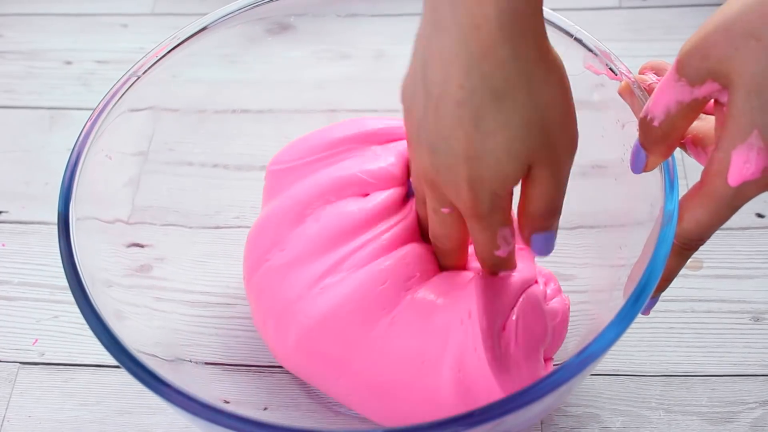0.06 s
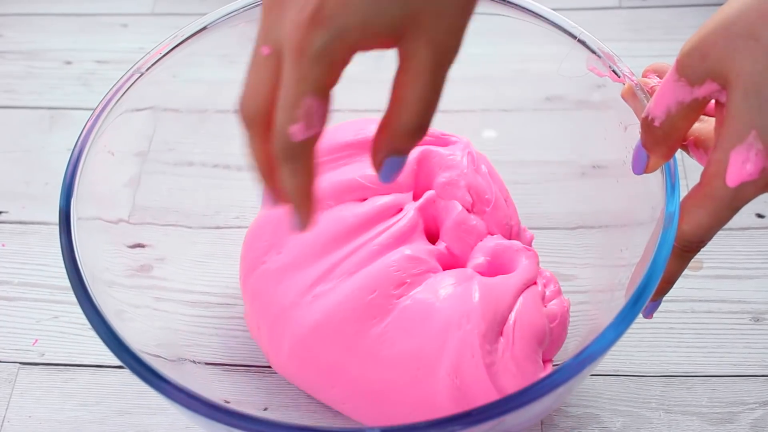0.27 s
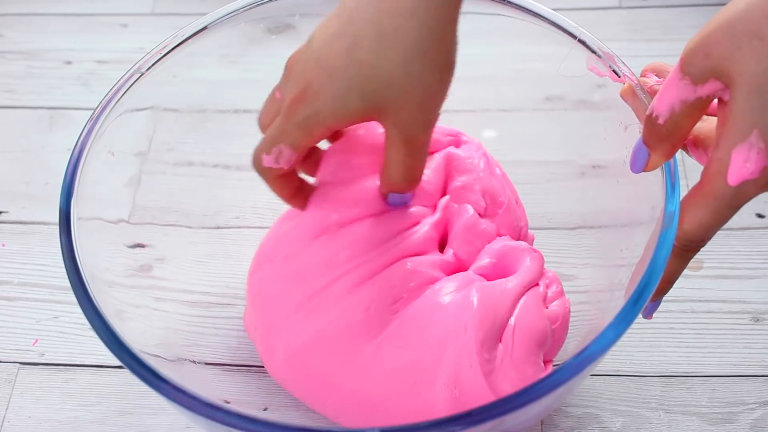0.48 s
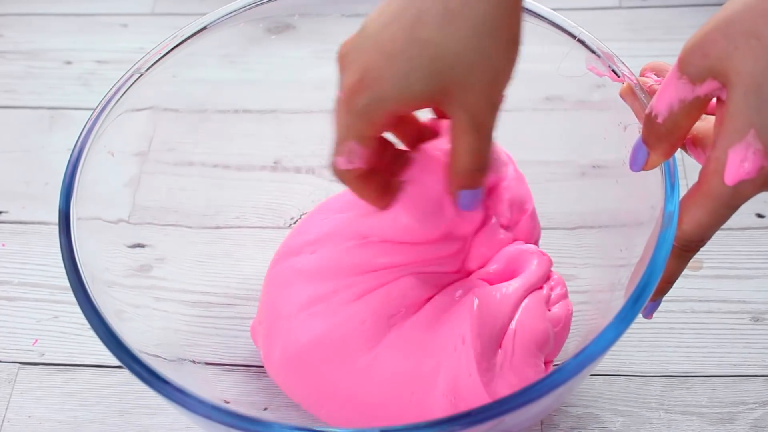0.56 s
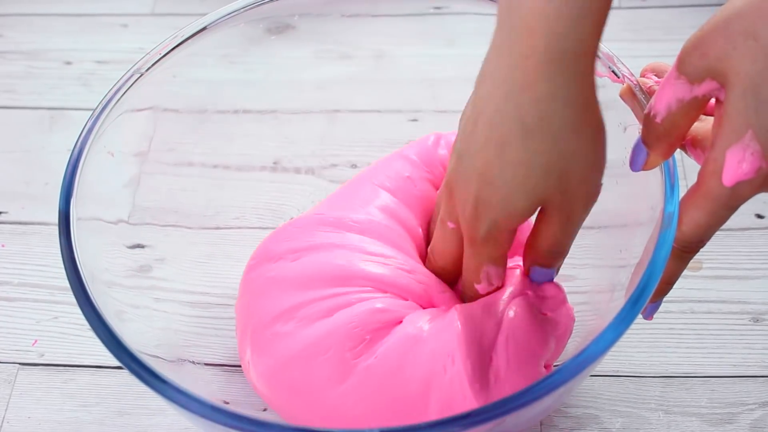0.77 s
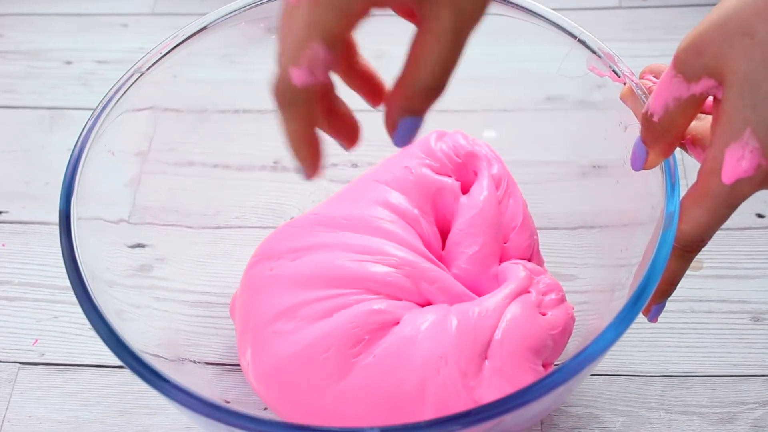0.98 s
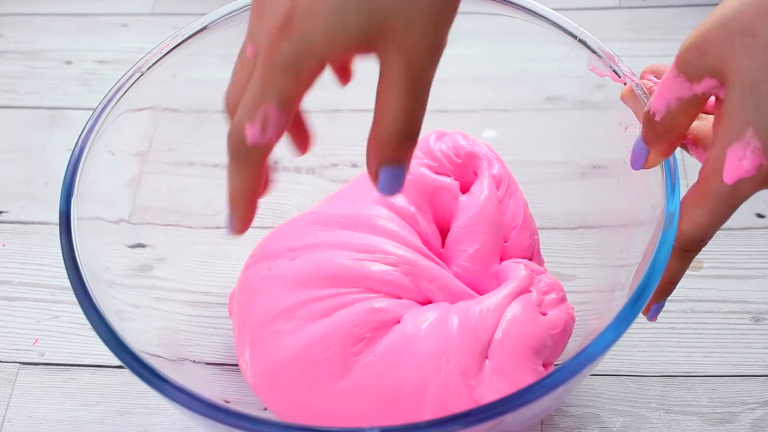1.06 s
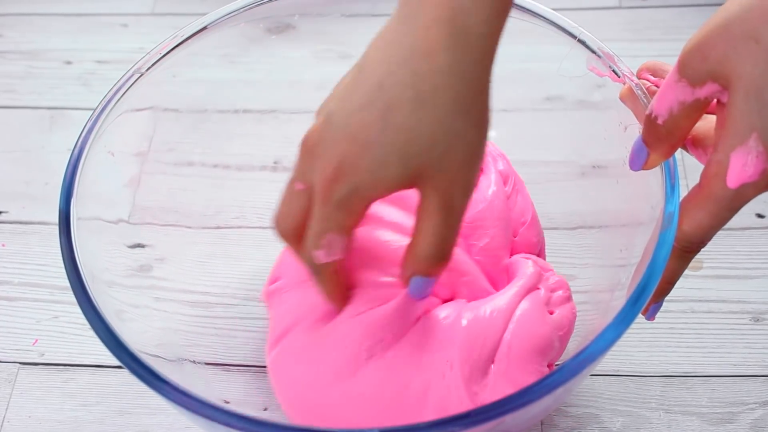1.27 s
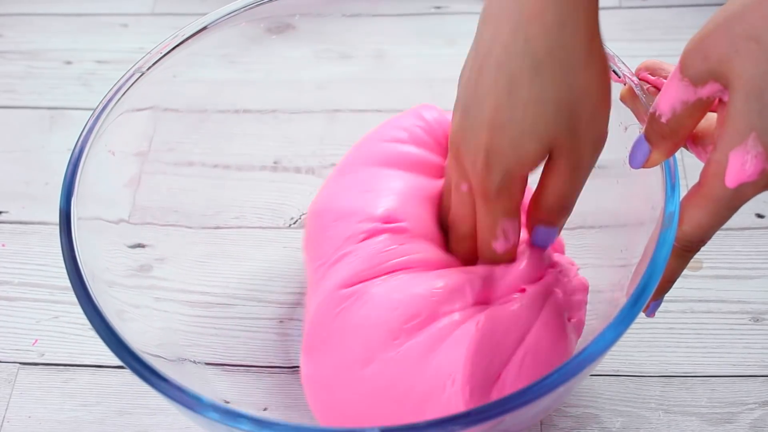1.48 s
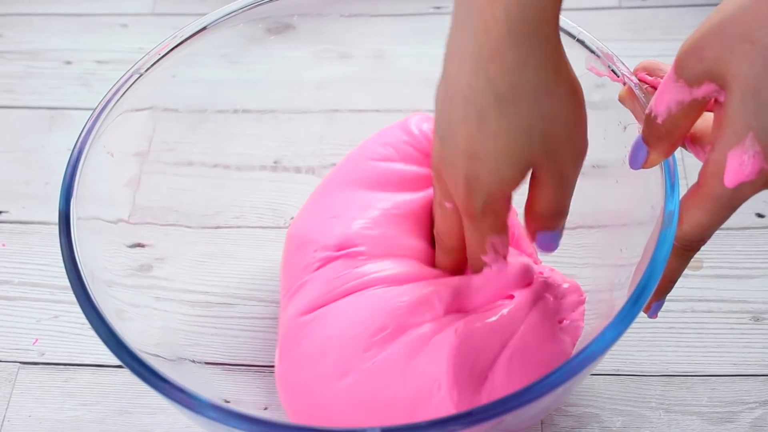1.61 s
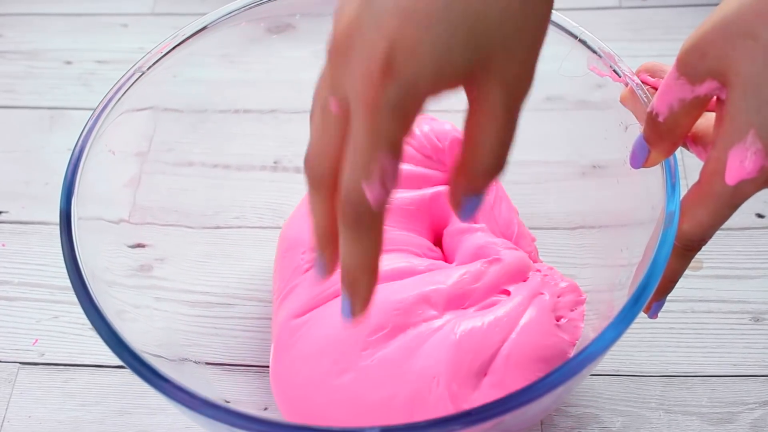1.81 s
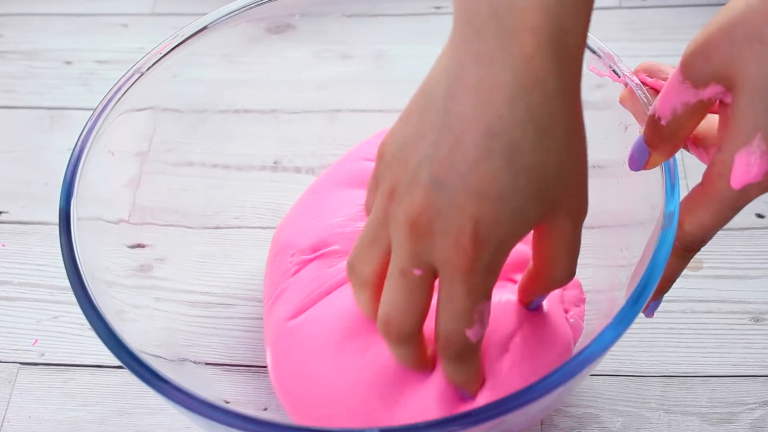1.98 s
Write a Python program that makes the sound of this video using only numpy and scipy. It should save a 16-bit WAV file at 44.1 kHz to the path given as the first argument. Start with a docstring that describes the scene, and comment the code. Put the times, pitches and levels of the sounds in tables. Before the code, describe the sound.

Sticky slime is kneaded close to the microphone in a small room. After a few faint ticks, a loud cluster of sharp pops and hollow gulps bursts at about 0.25 seconds. Two more clusters follow at about 1 second and 1.75 seconds, with softer gulps. Between them come small sticky clicks and a faint fizz of tiny bubbles as fingers press in, around 0.6 and 1.4 seconds.

```python
"""In a small room, fingers knead sticky slime in a glass bowl, close to a microphone.
Each push traps air that bursts out in a cluster of sharp pops and hollow gulps: the opened
cavities resonate, loudly enough to overload the microphone. Between the bursts tiny bubbles
fizz under the fingers, the skin peels off with small ticks, and the glass rings faintly."""
import sys
import numpy as np
from scipy import signal
from scipy.fft import rfft, irfft
from scipy.io import wavfile

SR = 44100
rng = np.random.default_rng(int(sys.argv[2]) if len(sys.argv) > 2 else 0)


def put_to_file(sound):
    """Save the sound as 16-bit audio at rate SR, in the file named by the first command-line argument."""
    columns = np.atleast_2d(sound).T  # one column per channel
    safe = np.clip(columns, -1, 1)
    whole_steps = np.round(safe * 32767)
    wavfile.write(sys.argv[1], SR, whole_steps.astype(np.int16))


N = 90404


def undb(db):
    """Amplitude ratio of a level in decibels."""
    return 10 ** (np.asarray(db) / 20)


def unit(x):
    """Normalisation to an rms of 1."""
    return x / np.sqrt(np.mean(x ** 2))


def fade(t, t60):
    """Exponential damping: 60 dB in t60 seconds."""
    return np.exp(-np.log(1000) * t / t60)


def add(out, start_s, x):
    """Superposition: x joins out at start_s."""
    i = max(int(start_s * SR), 0)
    out[i:i + len(x)] += x[:max(len(out) - i, 0)]


def colour(x, spectrum):
    """Spectral shaping by (frequency_hz, level_db) points, to an rms of 1."""
    hz, db = np.array(spectrum).T
    f = np.maximum(np.fft.rfftfreq(len(x), 1 / SR), 1)
    gain = undb(np.interp(np.log(f), np.log(hz), db))
    return unit(irfft(rfft(x) * gain, len(x)))


def band_noise(t, hz, width):
    """A resonance driven by noise; width is a fraction of its pitch."""
    f = np.maximum(np.fft.rfftfreq(len(t), 1 / SR), 1)
    detuning = (f / hz - hz / f) / width
    return unit(irfft(rfft(rng.standard_normal(len(t))) / (1 + detuning ** 2), len(t)))


def ring(t, modes):
    """Free vibration: a sum of damped (pitch_hz, level_db, t60_s) modes."""
    return sum(undb(db) * fade(t, t60) * np.sin(2 * np.pi * hz * t) for hz, db, t60 in modes)


def sagging_phase(t, hz, sag, sag_s):
    """Phase as the integral of a pitch that starts sharp by the fraction sag and settles."""
    return 2 * np.pi * hz * (t + sag * sag_s * (1 - np.exp(-t / sag_s)))


def crack(t, spectrum, decay_s):
    """A breaking film gives a brief, and so broadband, transient."""
    return colour(rng.standard_normal(len(t)), spectrum) * np.exp(-t / decay_s)


# spectrum of the room's rumble and hiss: frequency_hz, level_db
FLOOR_SPECTRUM = [(15, -29), (25, -14.5), (70, 2.5), (137, -8.5), (195, -1), (962, -22.5), (1190, -25.5),
                  (3520, -28.5), (4370, -33.5), (5430, -30.5), (6210, -35), (14400, -37.5), (16000, -40.5)]
def background(floor_db=-50.5, hum_hz=98, hum_db=-53.5):
    """The noise floor: steady broadband noise and one low tone."""
    hum = np.sqrt(2) * np.sin(2 * np.pi * hum_hz * np.arange(N) / SR)
    return undb(floor_db) * colour(rng.standard_normal(N), FLOOR_SPECTRUM) + undb(hum_db) * hum


# fingers pressing in, and starting to pull out: start_s, fullest_s, end_s, level_db
PRESS_STROKES = [(-.1, 0.032, 0.36, -63), (.54, 0.633, 0.81, -48.5), (1.358, 1.424, 1.564, -44.5),
                 (1.89, 1.937, 1.93, -57.5)]
PULL_STROKES = [(.775, .8, .85, -48), (1.6, 1.635, 1.69, -59.5)]
# spectra of the pressing fizz and the pulling squelch: frequency_hz, level_db
FIZZ_SPECTRUM = [(290, -30), (500, -13.5), (640, -10.5), (933, -2), (1670, -12.5), (1980, -6), (3150, -3.5),
                 (4940, -12.5), (12500, -15), (16000, -19.5)]
SQUELCH_SPECTRUM = [(150, -13), (350, 2.5), (700, -2.5), (1200, 3.5), (1900, -10.5), (3000, -15),
                    (9000, -27.5)]
def bubbles(strokes, spectrum, per_s, spread_db):
    """Shot noise: tiny bubbles break at random, louder as the finger pressure swells."""
    now = np.arange(N) / SR
    pressure = sum(undb(db) * np.interp(now, [start, fullest, end], [0, 1, 0])
                   for start, fullest, end, db in strokes)
    strengths = undb(spread_db * np.minimum(rng.exponential(size=N), 5))
    signs = rng.choice([-1, 1], N)
    breaks = rng.random(N) < per_s / SR
    return pressure * colour(strengths * signs * breaks, spectrum)


# modes of a faint, longer ring, likely the rim, and of the tapped glass: pitch_hz, level_db, t60_s
RIM_MODES = [(5470, -60, .45), (9220, -61, .15)]
GLASS_MODES = [(3640, 3.5, 0.053), (4823, -24.5, 0.055), (6650, -0.5, 0.1), (7500, -11, 0.14),
               (8260, -5.5, 0.051)]
# a fingernail touching the bowl: start_s, level_db
NAIL_TOUCHES = [(.508, -46.5)]
def bowl(t, rim_start_s=0.007):
    """Modal vibration: the glass rings faintly at its natural frequencies."""
    out = np.zeros(N)
    add(out, rim_start_s, ring(t, RIM_MODES))
    for start_s, db in NAIL_TOUCHES:
        add(out, start_s, undb(db) * ring(t, GLASS_MODES))
    return out


# slime peeling off the skin: start_s, level_db, pitch_hz, t60_s, click_relative_db
PEEL_TICKS = [(0.03, -41, 1150, 0.011, 7.5), (.083, -48.5, 1190, 0.049, -8), (0.196, -40, 1250, .02, -16),
              (0.218, -41, 2000, .04, -0.5), (0.4883, -41.5, 1510, 0.0049, -3),
              (.508, -43, 1074, 0.049, -10), (.532, -39, 2370, .012, -1), (.552, -39.5, 3020, .022, -17),
              (0.57, -53, 3100, .01, -2), (.632, -39, 2300, 0.015, -8), (0.7206, -37.5, 1883, .012, 4),
              (.813, -40.5, 790, 0.0092, -22.5), (.839, -35.5, 1350, 0.0078, -9),
              (0.8509, -35, 637, 0.023, -7), (0.8518, -34, 4280, 0.013, -8),
              (0.9164, -33.5, 3850, 0.0088, 14.5), (0.9475, -37.5, 1400, 0.0088, -8.5),
              (0.9587, -37.5, 1700, 0.032, -13), (.973, -36.5, 2720, 0.033, -6.5),
              (1.298, -43, 1296, 0.033, -23), (1.3152, -41.5, 1893, 0.011, 4),
              (1.323, -56, 1980, 0.013, -2), (1.359, -50, 2100, 0.017, -9), (1.378, -36, 2700, 0.0047, -28),
              (1.411, -36, 1420, 0.01, 6), (1.483, -38, 2500, 0.01, 2.5), (1.531, -49.5, 2920, .01, 12),
              (1.5995, -36.5, 1300, .018, -6.5), (1.612, -42.5, 1250, .025, 5.5),
              (1.645, -47, 1130, .03, -9.5), (1.96, -49, 1474, .02, -6.5)]
# spectrum of the click: frequency_hz, level_db
CLICK_SPECTRUM = [(200, -12.5), (1500, -12.5), (3800, -2.5), (7000, 1), (12000, -1), (16000, -6)]
def ticks(t):
    """Adhesion gives way suddenly, with a click and a heavily damped smack."""
    out = np.zeros(N)
    for start_s, db, hz, t60, click_db in PEEL_TICKS:
        smack = band_noise(t, hz, width=1.2) * fade(t, t60)
        click = undb(click_db) * crack(t, CLICK_SPECTRUM, decay_s=0.00016)
        add(out, start_s, undb(db) * (smack + click))
    return out


# bursting air pockets: start_s, level_db, pitch_hz, t60_s, crack_relative_db, tear_relative_db
POCKET_BURSTS = [(0.2298, 4, 10490, 0.004, -11, 3), (0.2322, -5.5, 2530, 0.014, -6.5, 4.5),
                 (0.2351, -7, 1187, 0.025, -8.5, -3), (0.243, -1.5, 5730, 0.012, 6, 2),
                 (0.2534, -2.5, 7160, 0.0059, -4, -9.5), (0.9861, -23.5, 3273, 0.0062, 10, -5.5),
                 (1.0009, -12.5, 3300, .005, 1.5, -1), (1.0029, 0.5, 3441, 0.016, -15, -1.5),
                 (1.004, -5.5, 6440, 0.0093, -18.5, -3.5), (1.7368, -5.5, 3200, 0.0063, -8, -1),
                 (1.752, -2, 5690, 0.0074, -10.5, 1), (1.7532, 2, 2748, 0.024, -19, -13.5),
                 (1.7548, -4, 1952, 0.014, -15, -3), (1.7763, -21.5, 2600, .005, -18, -26),
                 (1.7802, -12.5, 4480, 0.012, 2, -1)]
# modes of a small cavity: pitch_ratio, level_db
CAVITY_MODES = [(1, -2.5), (1.33, -10), (2.02, -9), (2.65, -12.5)]
# spectrum of the snapping film: frequency_hz, level_db
CRACK_SPECTRUM = [(100, -0.5), (600, 20), (1500, -13.5), (3500, 12.5), (7000, -0.5), (12000, -14),
                  (16000, -17)]
TOP_HZ = 16100  # upper limit of the cavity modes and of the recorder
def pops(t, attack_s=0.00046, linger_db=-30.5):
    """Cavity resonance: a film snaps, the pocket rings as its edge tears, and the pitch lingers."""
    out = np.zeros(N)
    for start_s, db, hz, t60, crack_db, tear_db in POCKET_BURSTS:
        phase = sagging_phase(t, hz, sag=0.22, sag_s=0.0011)
        tone = sum(undb(mode_db) * np.sin(ratio * phase)
                   for ratio, mode_db in CAVITY_MODES if ratio * hz < TOP_HZ)
        tear = undb(tear_db) * band_noise(t, hz, width=0.96)
        body = (tone + tear) * fade(t, t60)
        linger_t60 = 0.22 * min(3600 / hz, 1)  # high pitches die sooner
        linger = undb(linger_db) * band_noise(t, hz, width=0.088) * fade(t, linger_t60)
        swell = 1 - np.exp(-t / attack_s)
        snap = undb(crack_db) * crack(t, CRACK_SPECTRUM, decay_s=0.001)
        add(out, start_s, undb(db) * ((body + linger) * swell + snap))
    return out


# large air pockets opening: start_s, level_db, pitch_hz, t60_s
LARGE_POCKETS = [(.2335, -0.5, 585, 0.054), (.2352, 1.5, 223.6, 0.04), (.2531, -6.5, 558, .025),
                 (.2838, 4, 295, 0.077), (.289, -18, 103.6, 0.13), (0.85, -34, 307.3, 0.069),
                 (.962, -22, 248, 0.051), (.9862, -25.5, 623, 0.023), (1.0055, -16, 221, 0.082),
                 (1.007, -17.5, 340, 0.051), (1.008, -26, 115, 0.16), (1.7371, -18, 637, 0.02),
                 (1.7534, -24.5, 301, 0.059), (1.7795, -19.5, 254, 0.075), (1.7802, -7.5, 611, 0.013),
                 (1.783, -29, 92, 0.079)]
def gulps(t, attack_s=0.0011, wet_db=-15.5):
    """Larger cavities resonate lower: a hollow, nearly pure tone with a little wet noise."""
    out = np.zeros(N)
    for start_s, db, hz, t60 in LARGE_POCKETS:
        tone = -np.sin(sagging_phase(t, hz, sag=0.048, sag_s=0.0049))
        wet = undb(wet_db) * band_noise(t, hz, width=0.97)
        swell = 1 - np.exp(-t / attack_s)
        add(out, start_s, undb(db) * (tone + wet) * fade(t, t60) * swell)
    return out


# low resonances of the room: pitch_hz, level_db, t60_s
ROOM_MODES = [(107.5, -62.5, 0.23), (281, -63.5, 0.088)]
# bass reflections off table and walls: delay_s, level_db
REFLECTIONS = [(0.024, -10.5), (0.0555, -28.5)]
# diffuse reverberation: frequency_hz, t60_s, level_db
REVERB_BANDS = [(100, 0.26, -13.5), (300, 0.32, -13), (620, 0.11, -8.5), (1190, 0.18, -8.5),
                (3000, 0.22, -9.5), (6500, 0.22, -11.5), (10200, .21, -14), (16000, 0.13, -17)]
def room(t, echo_top_hz=600, onset_s=0.00087):
    """Impulse response: the sum of direct sound, room modes, bass echoes and a diffuse tail."""
    response = ring(t, ROOM_MODES)
    response[0] += 1  # direct sound
    echoes = np.zeros(len(t))
    for delay_s, db in REFLECTIONS:
        add(echoes, delay_s, undb([db]))
    response += signal.sosfilt(signal.butter(2, echo_top_hz, fs=SR, output="sos"), echoes)
    hz, t60, db = np.array(REVERB_BANDS).T
    f = np.fft.rfftfreq(len(t), 1 / SR)
    noise = rfft(rng.standard_normal(len(t)))
    onset = 1 - np.exp(-(t / onset_s) ** 2)
    edges_hz = np.geomspace(60, 17000, 15)
    for lo, hi in zip(edges_hz, edges_hz[1:]):
        log_centre = np.log(lo * hi) / 2
        band_t60 = np.interp(log_centre, np.log(hz), t60)
        band_db = np.interp(log_centre, np.log(hz), db)
        tail = irfft(noise * (f >= lo) * (f < hi), len(t)) * fade(t, band_t60) * onset
        tail *= np.sqrt(2 * (hi - lo) / SR / np.sum(tail ** 2))  # the direct sound's energy in this band
        response += undb(band_db) * tail
    return response


def scene():
    """Convolution with the room's response places the slime and its bowl in the room."""
    t = np.arange(SR // 2) / SR
    pressing = bubbles(PRESS_STROKES, FIZZ_SPECTRUM, per_s=1900, spread_db=3.5)
    pulling = bubbles(PULL_STROKES, SQUELCH_SPECTRUM, per_s=3100, spread_db=-1)
    slime = pops(t) + gulps(t) + ticks(t) + pressing + pulling + bowl(t)
    return (signal.fftconvolve(slime, room(t))[:N] + background())[None]


def record(dry):
    """Overload clips the loudest peaks, and a low-pass filter limits the bandwidth."""
    lowpass = signal.ellip(8, .2, 60, TOP_HZ, fs=SR, output="sos")
    return signal.sosfilt(lowpass, np.clip(dry, -1, 1))


dry = scene()
out = record(dry)
put_to_file(out)
```